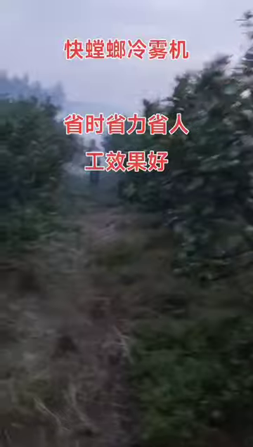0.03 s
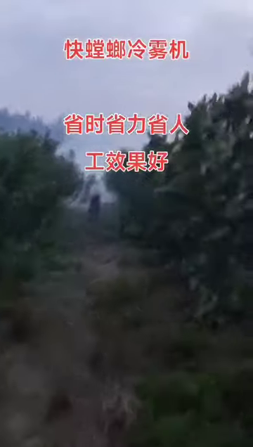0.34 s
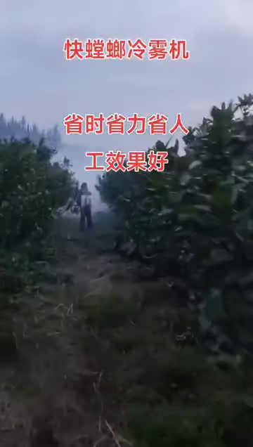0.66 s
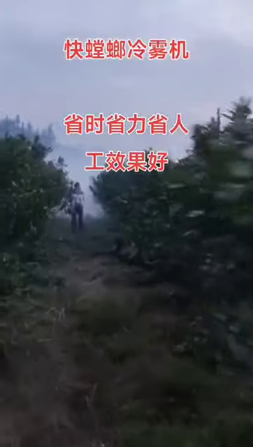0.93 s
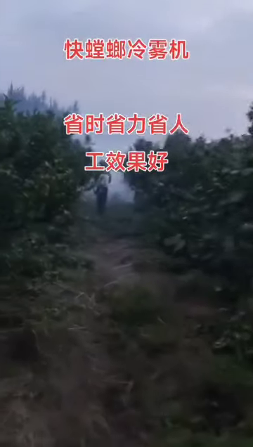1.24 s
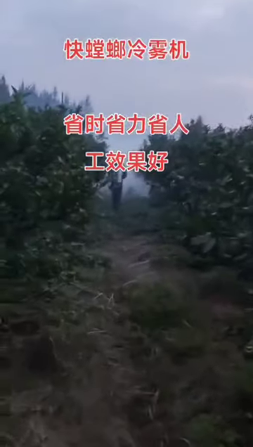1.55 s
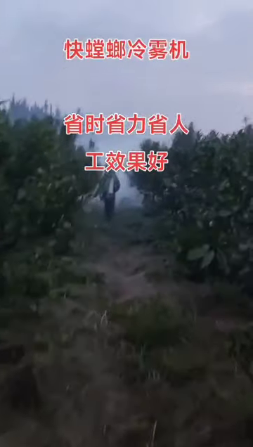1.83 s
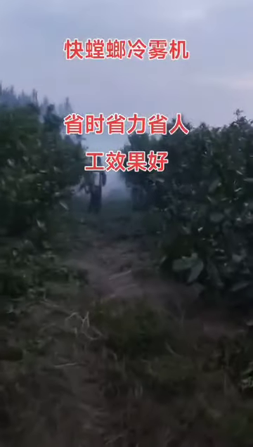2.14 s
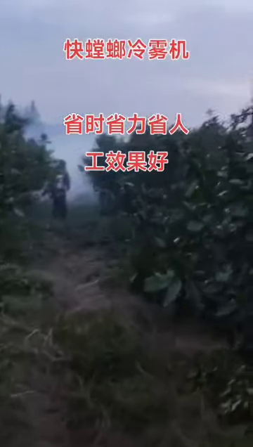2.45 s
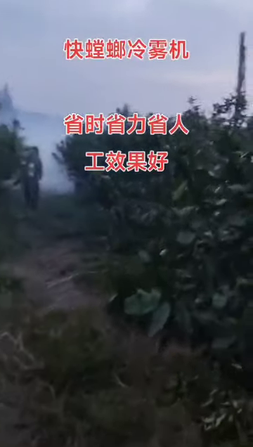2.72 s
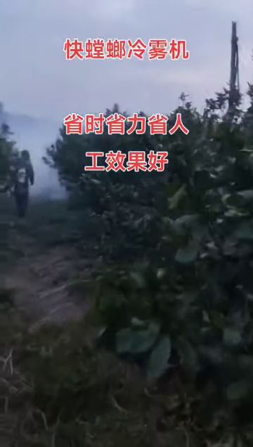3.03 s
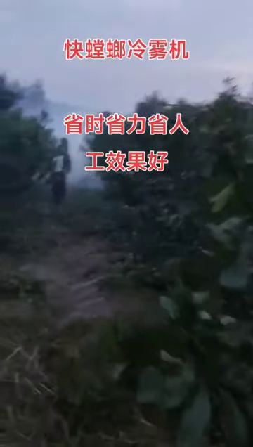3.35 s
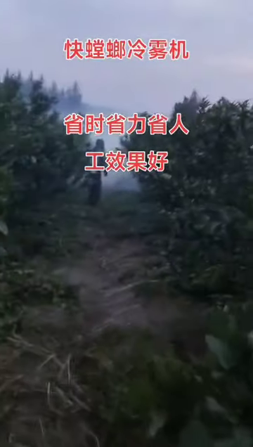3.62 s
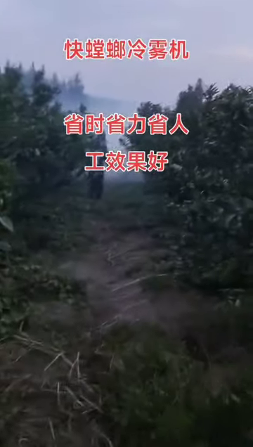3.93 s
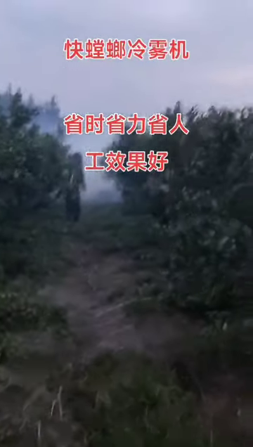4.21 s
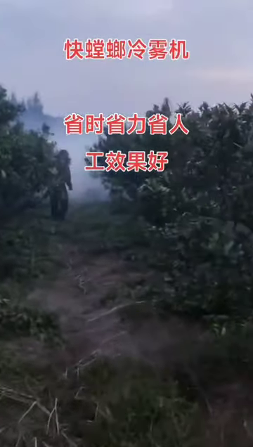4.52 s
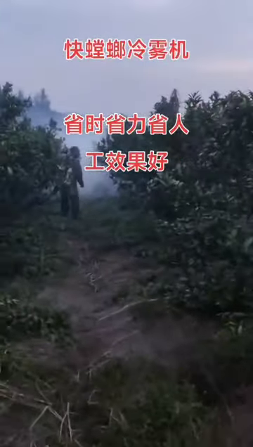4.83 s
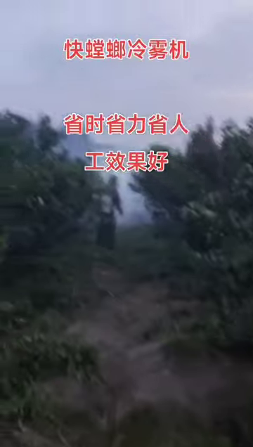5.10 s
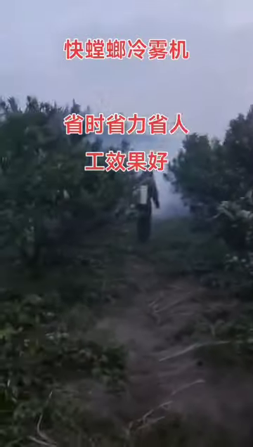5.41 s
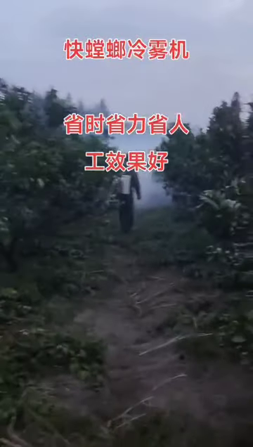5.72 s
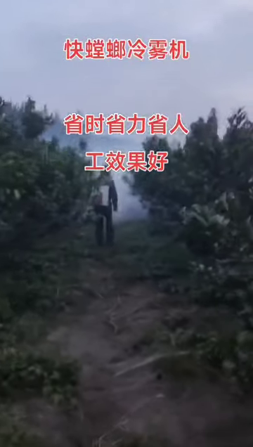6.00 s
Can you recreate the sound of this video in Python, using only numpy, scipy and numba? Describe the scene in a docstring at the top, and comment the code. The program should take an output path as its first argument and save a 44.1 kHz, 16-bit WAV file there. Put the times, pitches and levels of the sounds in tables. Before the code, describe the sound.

Continuous rumbling roar and bright spray hiss from a backpack fogger in an orchard, with a few soft thumps underneath.

```python
"""Fogging machine in an orchard

A backpack fogger blows mist between the trees, some way off from a hand-held mono microphone.
No single firings stand out: the turbulent jet rumbles, booms in the blow tube, roars and rasps at its
mouth. The nozzle hisses and half whistles as air tears the liquid into mist, and the colour shifts
as the tube is swung about. A few soft thumps lie under the roar."""
import sys
import numpy as np
from scipy import signal
from scipy.fft import rfft, irfft
from scipy.io import wavfile
from scipy.ndimage import uniform_filter1d, map_coordinates
from numba import njit

SR = 44100
rng = np.random.default_rng(int(sys.argv[2]) if len(sys.argv) > 2 else 0)


def digitize_waveform(pressure):
    """Quantize a signal to 16-bit integers and store it at the path in sys.argv[1].

    Rows of a 2-D input are taken as channels; values are limited to [-1, 1].
    """
    field = np.atleast_2d(pressure).T
    bounded = np.clip(field, -1, 1)
    quanta = np.round(bounded * 32767).astype(np.int16)
    wavfile.write(sys.argv[1], SR, quanta)


N = 276066
TIME = np.arange(N) / SR


def undb(db):
    """Decibels to gain."""
    return 10 ** (np.asarray(db) / 20)


def unit(x):
    """Scale to an rms of 1."""
    return x / np.sqrt(np.mean(x ** 2))


def curves(table):
    """Each column after the first (time) as a value per sample."""
    times, *columns = np.transpose(table)
    return [np.interp(TIME, times, column) for column in columns]


def noise(colour):
    """Noise of rms 1 with a spectrum of (f/Hz, level/dB) points."""
    hz, db = np.transpose(colour)
    bins = np.maximum(np.fft.rfftfreq(N, 1 / SR), 1)
    gain = undb(np.interp(np.log(bins), np.log(hz), db))
    return unit(irfft(rfft(rng.standard_normal(N)) * gain, N))


def walk(rate_hz):
    """Random steps, smoothed twice; rms 1."""
    hold = max(int(SR / rate_hz), 2)
    steps = np.repeat(rng.standard_normal(N // hold + 1), hold)
    return unit(uniform_filter1d(uniform_filter1d(steps, hold), hold)[:N])


@njit
def bandpass(x, hz, width_hz):
    """State-variable band-pass whose centre and width may move every sample."""
    out, band, low = np.empty(len(x)), 0., 0.
    for i in range(len(x)):
        g, damping = np.tan(np.pi * hz[i] / SR), width_hz[i] / hz[i]
        v = (band + g * (x[i] - low)) / (1 + g * (g + damping))
        band, low = 2 * v - band, low + 2 * g * v
        out[i] = damping * v
    return out


def resonance(drive, hz, width_hz):
    """Turbulence of strength `drive` rings a resonance with steep skirts; rms 1 at any width."""
    centre, width = hz * np.ones(N), width_hz * np.ones(N)
    push = drive * rng.standard_normal(N) / np.sqrt(width)
    return unit(bandpass(bandpass(push, centre, width), centre, width))


def sustained(x, span_s):
    """Steady blowing: the sound flutters quickly but keeps its strength over span_s."""
    size = max(int(span_s * SR), 2)
    power = uniform_filter1d(uniform_filter1d(x ** 2, size), size)
    return x / np.sqrt(power + 1e-9)


def jet_rumble(eddies, trim_db=0.13):
    """The jet's deep rumble spreads all round, so it changes little at the microphone."""
    # rumble spectrum: f/Hz, level/dB
    colour = [(20, -45), (45, -43), (62, -50), (85, -16), (115, -6.5), (165, -0.8), (225, 1), (270, 0.5),
              (330, -4), (375, -7.5), (430, -12), (540, -19), (900, -24.5), (2500, -39.5)]
    # rumble strength: t/s, level/dB
    strength = [(0.23, -62), (0.38, -49), (0.48, -54.0), (0.75, -51), (1.08, -50.5), (1.3, -52.5),
                (1.47, -48.5), (1.58, -56.5), (1.7, -48.5), (1.88, -51), (2.0, -48), (2.2, -46.0),
                (2.42, -51), (2.58, -50.5), (2.8, -48.5), (3.12, -49), (3.45, -51.0), (3.78, -47),
                (4.05, -49.0), (4.35, -47.5), (4.65, -51.5), (4.98, -51), (5.3, -48.5), (5.58, -50.5),
                (5.8, -46.5), (5.92, -44.5), (6.05, -49.5), (6.26, -47.5)]
    (level_db,) = curves(strength)
    return sustained(noise(colour) * undb(eddies), span_s=0.12) * undb(level_db + trim_db)


def tube_boom(eddies, trim_db=1.1, top_hz=389):
    """The tube's air column rings in ragged bursts; blown hard, it locks into a wavering hoot."""
    # the boom's irregular surges and dips: t/s, level/dB
    strength = [(0.23, -54.5), (0.35, -50.5), (0.47, -45.5), (0.53, -52), (0.58, -42.5), (0.7, -52),
                (0.97, -48.5), (1.15, -55), (1.3, -45.5), (1.45, -60.5), (1.62, -61.5), (1.9, -52.5),
                (2.01, -44), (2.2, -52), (2.39, -56.5), (2.49, -43.5), (2.57, -47.5), (2.77, -44.5),
                (2.8, -54.5), (2.87, -46.5), (3.2, -51.5), (3.37, -59.5), (3.55, -52.5), (3.77, -52.5),
                (3.84, -44.5), (3.92, -47), (4.01, -45.5), (4.17, -49.5), (4.33, -43.0), (4.4, -41.5),
                (4.5, -53), (4.57, -46.5), (4.7, -53), (4.79, -56.5), (4.91, -54), (4.97, -45.5),
                (5.3, -53), (5.55, -51.0), (5.8, -47.0), (5.85, -57), (5.93, -49), (6.03, -52.5),
                (6.13, -56), (6.17, -44), (6.26, -44.5)]
    # wandering pitch of the air column: t/s, f/Hz
    pitch = [(0.3, 323.5), (0.6, 312.3), (0.9, 308), (1.32, 326), (1.5, 304.3), (2.0, 315.7), (2.3, 309),
             (2.46, 346.7), (2.58, 312.9), (2.76, 305), (2.9, 322.8), (3.6, 308), (3.9, 332), (4.03, 313),
             (4.35, 324.1), (4.6, 329.2), (5.08, 327.2), (5.5, 318), (5.75, 292), (5.95, 305.2),
             (6.25, 290.5)]
    (level_db,), (hz,) = curves(strength), curves(pitch)
    ragged = sustained(resonance(undb(0.8 * eddies), hz, width_hz=78), span_s=0.05)
    hoot_hz = hz * (1 + 0.025 * walk(rate_hz=20) + 0.04 * walk(rate_hz=170))
    hoot = unit(np.sin(2 * np.pi * np.cumsum(hoot_hz) / SR) * undb(1.4 * eddies))
    lock = np.clip((level_db + 53) / 12, 0, 0.75)  # the hoot's share of the power
    boom = (np.sqrt(1 - lock) * ragged + np.sqrt(lock) * hoot) * undb(level_db + trim_db)
    return signal.sosfiltfilt(signal.butter(8, top_hz, fs=SR, output="sos"), boom)


def mouth_roar(eddies, hz, width_hz, trim_db=-0.5):
    """Eddies drive a broad resonance at the tube's mouth; two narrow modes give it a hollow ring."""
    # roar strength: t/s, level/dB
    strength = [(0.23, -65.5), (0.31, -58.5), (0.5, -54), (0.62, -58), (1.0, -56), (1.2, -59), (1.41, -57),
                (1.5, -63.5), (1.64, -63.5), (1.86, -61.5), (1.99, -52), (2.17, -52), (2.31, -61),
                (2.42, -58), (2.52, -53), (2.66, -52), (2.79, -57), (2.98, -51), (3.22, -55.5),
                (3.31, -62.5), (3.56, -64), (3.85, -52.5), (3.95, -59.5), (4.06, -54.5), (4.32, -52),
                (4.62, -55.5), (4.83, -65.5), (5.0, -55), (5.55, -56), (5.86, -52.5), (5.94, -50),
                (5.99, -54.5), (6.06, -55), (6.17, -47.5), (6.26, -53.5)]
    # drifting narrow mode: t/s, f/Hz, level/dB against the roar
    mode = [(0.4, 680, -8), (0.8, 655, -4), (1.3, 697, -7), (2.05, 695, -4), (2.55, 640, -8.5),
            (3.05, 720, -10), (3.5, 680, -5), (3.85, 640, -5.5), (4.3, 700, -14), (5.2, 695, -8),
            (5.72, 695, -5), (5.88, 700, -1), (5.93, 700, -4), (6.2, 680, -16)]
    (level_db,), (ring_hz, ring_db) = curves(strength), curves(mode)
    roar = sustained(resonance(undb(0.99 * eddies), hz, width_hz), span_s=0.098)
    roar += undb(ring_db) * sustained(resonance(1, ring_hz, width_hz=85), span_s=0.12)
    roar += undb(-13) * resonance(1, hz=885, width_hz=93)
    return roar * undb(level_db + trim_db)


def mouth_rasp(eddies, hz, width_hz, trim_db=-1.17):
    """Eddies shake a higher resonance at the mouth more roughly; a narrow mode makes it nasal."""
    # rasp strength: t/s, level/dB
    strength = [(0.23, -66), (0.33, -59.5), (0.5, -56), (0.7, -59.5), (1.2, -62.5), (1.55, -59.5),
                (1.9, -55.5), (2.33, -62.5), (2.46, -54), (2.68, -55), (2.83, -63.5), (3.3, -64.5),
                (3.88, -64.5), (4.06, -54), (4.3, -51), (4.42, -59), (4.68, -59), (4.82, -65), (5.0, -57),
                (5.13, -53.5), (5.4, -54.5), (5.5, -60), (6.05, -59), (6.15, -55), (6.26, -57.5)]
    # drifting nasal mode: t/s, f/Hz, level/dB against the rasp
    mode = [(0.4, 1650, -7), (1.0, 1680, -20), (1.35, 1586, -1), (1.6, 1600, -7), (1.88, 1690, -4.5),
            (2.2, 1600, -8), (2.65, 1626, -8), (3.0, 1630, -4), (3.35, 1575, -7), (3.8, 1560, -19),
            (4.9, 1670, -20), (5.12, 1670, -6), (5.25, 1700, -5), (5.4, 1610, 0), (5.55, 1660, -23)]
    (level_db,), (ring_hz, ring_db) = curves(strength), curves(mode)
    rasp = resonance(undb(2 * eddies), hz, width_hz)
    rasp += undb(ring_db) * sustained(resonance(1, ring_hz, width_hz=60), span_s=0.15)
    return rasp * undb(level_db + trim_db)


def jet():
    """The same bursts of turbulence shake the rumble, the tube's air column and its mouth."""
    # mouth resonances as the tube swings: t/s, roar f/Hz, roar width/Hz, rasp f/Hz, rasp width/Hz
    swing = [(0.6, 705, 577, 1700, 825), (1.9, 684, 350, 1540, 603), (2.6, 750, 950, 1560, 900),
             (3.05, 707, 252, 1510, 600), (3.8, 645, 250, 1430, 650), (4.25, 866, 372, 1411, 860),
             (4.7, 850, 312, 1750, 820), (5.25, 830, 433, 1800, 470), (5.6, 855, 426, 1811, 450),
             (5.8, 715, 280, 1730, 450), (5.95, 826, 370, 1769, 550), (6.25, 900, 507, 1620, 780)]
    roar_hz, roar_width, rasp_hz, rasp_width = curves(swing)
    eddies = walk(rate_hz=170)
    rumble = jet_rumble(eddies)
    roar = mouth_roar(eddies, roar_hz, roar_width)
    rasp = mouth_rasp(eddies, rasp_hz, rasp_width)
    return rumble + tube_boom(eddies) + roar + rasp


def nozzle_mist(hiss_trim_db=0.89, rush_trim_db=2.5, flutter_db=0.86, sputter_db=1.0):
    """Air tears the liquid into mist: a slightly fluttering hiss over a lower rush."""
    # spectra of the hiss and the rush of air: f/Hz, level/dB
    hiss_colour = [(1500, -20), (3000, -16.5), (4000, -5), (5100, -1), (6400, 3), (7300, 4), (7900, -2),
                   (8800, -0.5), (10000, -5), (11000, -11.5), (12000, -8), (14000, -47)]
    rush_colour = [(300, -38), (550, -44), (1000, 0), (1500, -3.5), (1850, -1.5), (2250, 3), (2800, -3),
                   (3200, 1), (3800, 1), (5000, -2), (9000, -30)]
    # hiss, louder with fewer leaves between nozzle and microphone: t/s, level/dB
    hiss_strength = [(0.23, -58), (0.31, -53), (0.37, -49.5), (0.6, -50.5), (0.86, -49), (1.05, -48),
                     (1.15, -49.5), (1.44, -52), (1.66, -50), (2.11, -53.5), (2.27, -51), (2.55, -49.5),
                     (2.84, -49.5), (2.93, -53), (3.3, -49.5), (3.6, -49), (3.72, -51.5), (4.16, -48.5),
                     (4.23, -48.5), (4.35, -48), (4.55, -49), (4.82, -46.5), (4.93, -47.5), (5.3, -47.5),
                     (5.61, -47), (5.76, -50.5), (5.85, -48), (6.26, -48.5)]
    # rush of air: t/s, level/dB
    rush_strength = [(0.23, -70), (0.38, -60.5), (0.7, -62.5), (0.9, -55.5), (1.05, -61.5), (1.45, -62.5),
                     (2.1, -59.5), (2.4, -60.5), (2.85, -59), (3.1, -56), (3.42, -59.5), (3.85, -55),
                     (4.15, -56), (4.6, -55.5), (4.72, -54), (4.9, -56), (5.12, -55), (5.6, -56.5),
                     (6.26, -60.5)]
    (hiss_db,), (rush_db,) = curves(hiss_strength), curves(rush_strength)
    flutter = undb(flutter_db * walk(rate_hz=30))
    hiss = noise(hiss_colour)
    # the brightest band sputters on its own as the liquid feed wavers
    bright = bandpass(hiss, hz=np.full(N, 6800.), width_hz=np.full(N, 1500.))
    hiss += (undb(sputter_db * walk(rate_hz=22)) - 1) * bright
    rush = noise(rush_colour) * undb(rush_db + rush_trim_db)
    return flutter * (hiss * undb(hiss_db + hiss_trim_db) + rush)


def ground_echo(x, lag_s, sway, reflect_db):
    """The ground returns the sound a little later; the lag sways as tube and microphone move."""
    lag = lag_s * np.exp(sway * walk(rate_hz=1.5))
    echo = map_coordinates(x, [(TIME - lag) * SR], order=3)
    return (x + undb(reflect_db) * echo) / np.hypot(1, undb(reflect_db))


def hollow(x, notch, width_hz):
    """Two paths to the microphone cancel in one band, which moves as the tube is swung."""
    hz, depth = curves(notch)
    return x - np.clip(depth, 0, 1) * bandpass(x, hz, width_hz * np.ones(N))


def thumps(decay_s=0.003, knock_db=-1, knock_hz=780, knock_decay_s=0.0006, low_cut_hz=130):
    """Dull blows that die within a cycle or two, each with a short higher knock and no deep bass."""
    # soft blows under the roar: t/s, level/dB, f/Hz
    blows = [(0.63, -37, 310), (0.895, -36, 303), (1.003, -29, 290), (1.151, -32.5, 280),
             (1.996, -31.5, 292), (4.44, -35, 326), (5.936, -32, 240)]
    out = np.zeros(N)
    for start_s, db, hz in blows:
        age = np.maximum(TIME - start_s, 0)
        body = np.sin(2 * np.pi * hz * age) * np.exp(-age / decay_s)
        knock = np.sin(2 * np.pi * knock_hz * age) * np.exp(-age / knock_decay_s)
        out -= undb(db) * (body + undb(knock_db) * knock)
    return signal.sosfilt(signal.butter(4, low_cut_hz, "high", fs=SR, output="sos"), out)


def nozzle_whistles(width_hz=97):
    """Brief, breathy tones at the nozzle that swell and die away."""
    # half whistles: centre t/s, length/s, f/Hz, level/dB
    tones = [(0.82, 0.18, 6370, -58), (2.57, 0.31, 6480, -55), (3.35, .22, 7100, -58),
             (4.64, .18, 5930, -54), (4.81, 0.34, 6250, -57), (4.83, .5, 6530, -56.5)]
    out = np.zeros(N)
    for centre_s, length_s, hz, db in tones:
        swell = np.cos(np.pi * np.clip((TIME - centre_s) / length_s, -0.5, 0.5))
        out += undb(db) * swell * sustained(resonance(1, hz, width_hz), span_s=0.04)
    return out


def scene():
    """Jet, spray with its faint ground echo, and thumps from some way off, alike in both channels."""
    # bands that cancel at the microphone, in the roar and in the rasp: t/s, f/Hz, depth/0-1
    lower_notch = [(0.4, 770, 0.3), (0.7, 754, 0.8), (1.05, 720, .6), (1.3, 760, 0.14), (2.1, 799.5, 0),
                   (2.55, 754, 1), (2.899, 674, 0.16), (3.8, 520, 0.36), (4.4, 590, 0.4), (4.8, 646, 0.3),
                   (5.35, 540, 0.5), (5.8, 535, 0.6), (5.93, 557, 0.3), (6.2, 640, 0)]
    upper_notch = [(0.9, 2200, .1), (1.2, 2150, .4), (1.75, 2670, 0.9), (2.6, 2450, 0.4), (2.9, 1780, .1),
                   (3.2, 1780, 0.63), (3.6, 1850, 0.3), (3.85, 1930, 0), (4.12, 2060, 1), (4.4, 2080, 0),
                   (4.85, 2020, 0.7), (5.0, 1450, 0.39), (5.15, 1430, 0.65), (5.8, 1460, 0),
                   (6.25, 1500, 0.01)]
    spray = ground_echo(nozzle_mist() + nozzle_whistles(), lag_s=0.002, sway=0.25, reflect_db=-17)
    machine = hollow(jet(), lower_notch, width_hz=132) + spray
    mono = hollow(machine, upper_notch, width_hz=190) + thumps()
    return np.array([mono, mono])


def record(dry, open_s=0.221, top_hz=12100):
    """After a moment of silence the sound cuts in abruptly; the top treble is cut steeply."""
    opened = dry * (TIME >= open_s)
    return signal.sosfilt(signal.ellip(12, 0.2, 80, top_hz, fs=SR, output="sos"), opened)


dry = scene()
out = record(dry)
digitize_waveform(out)
```